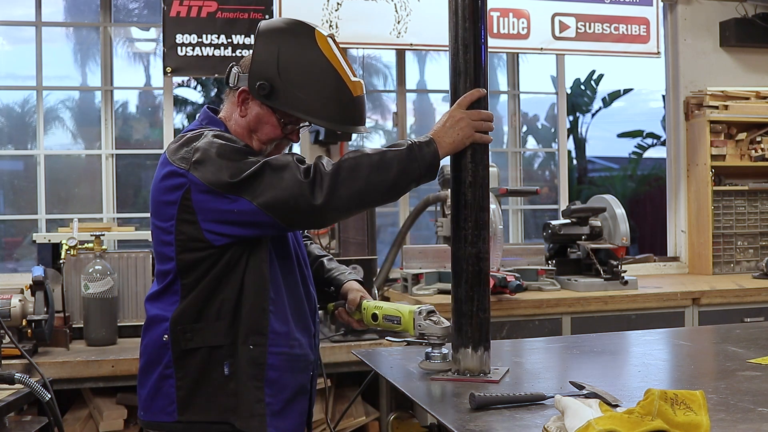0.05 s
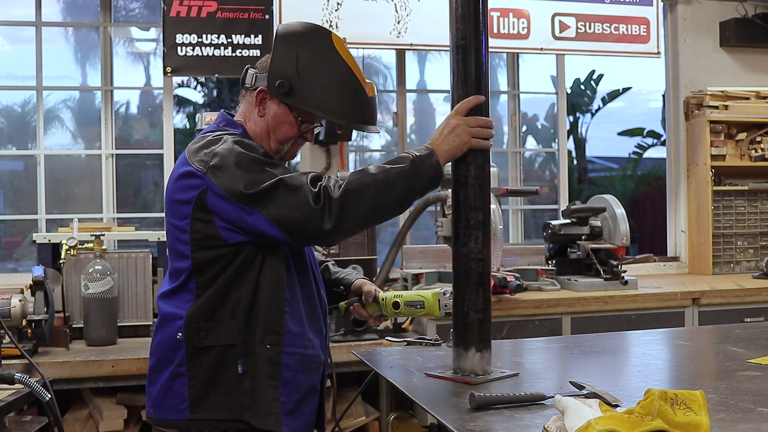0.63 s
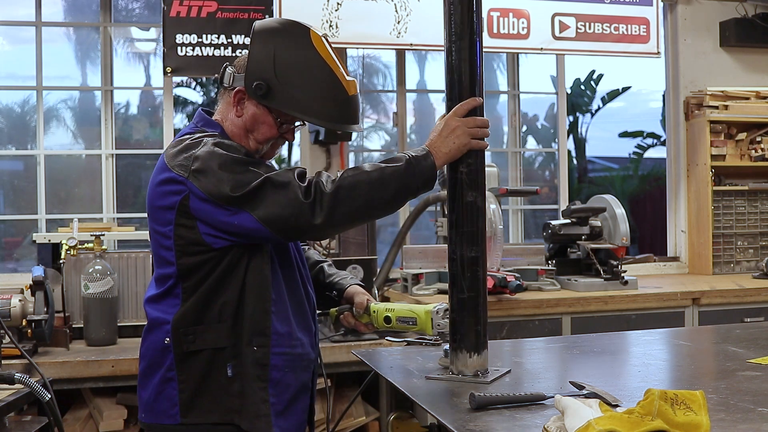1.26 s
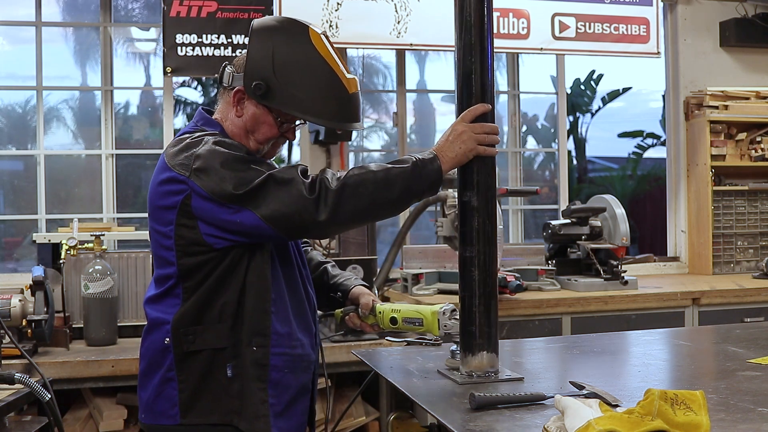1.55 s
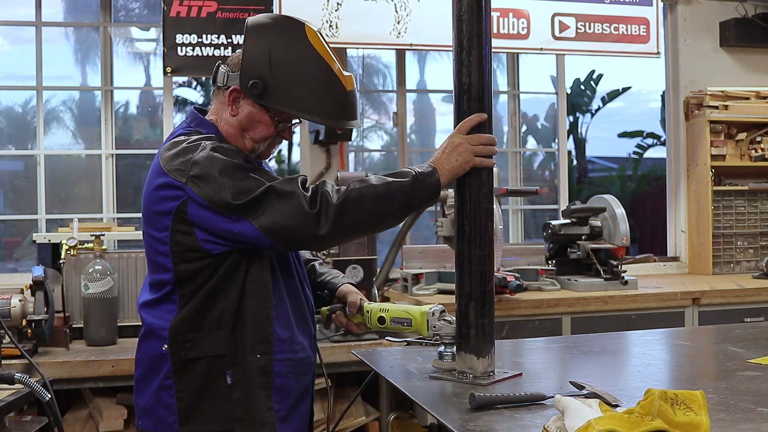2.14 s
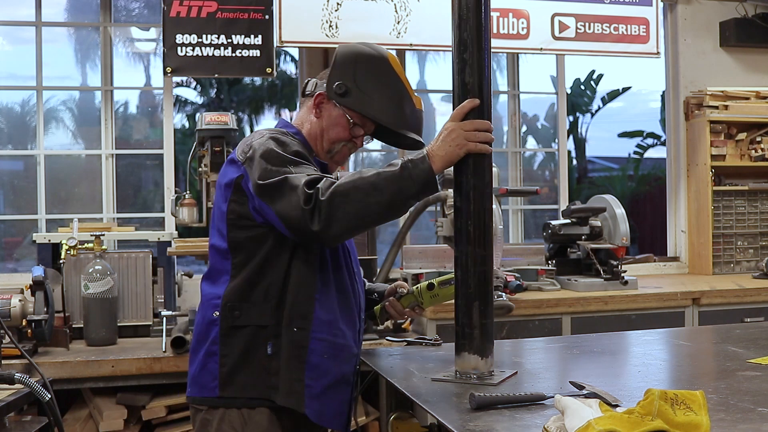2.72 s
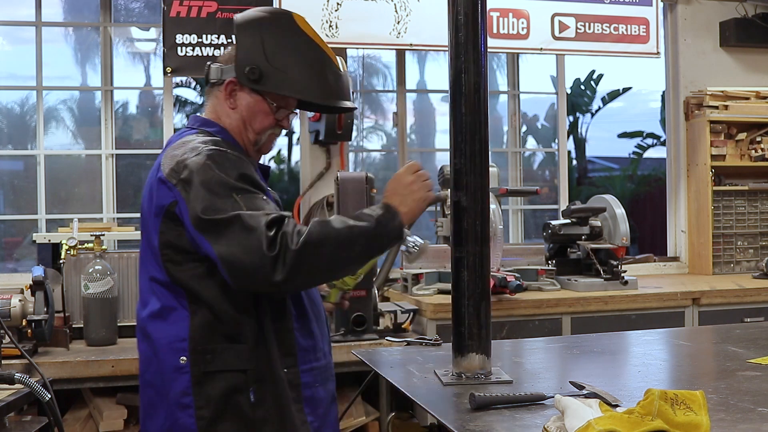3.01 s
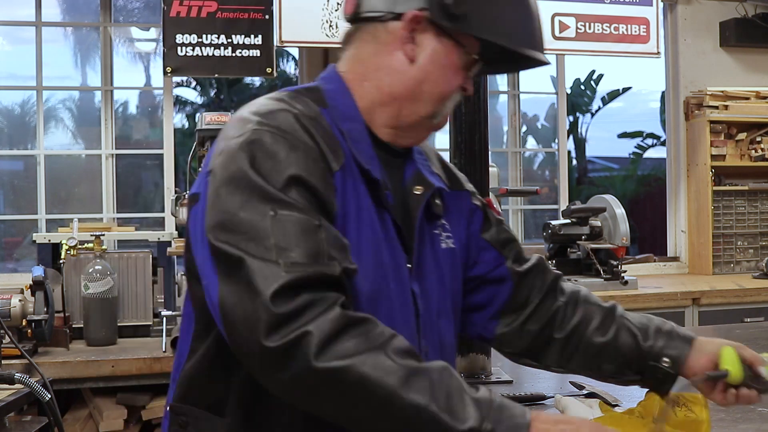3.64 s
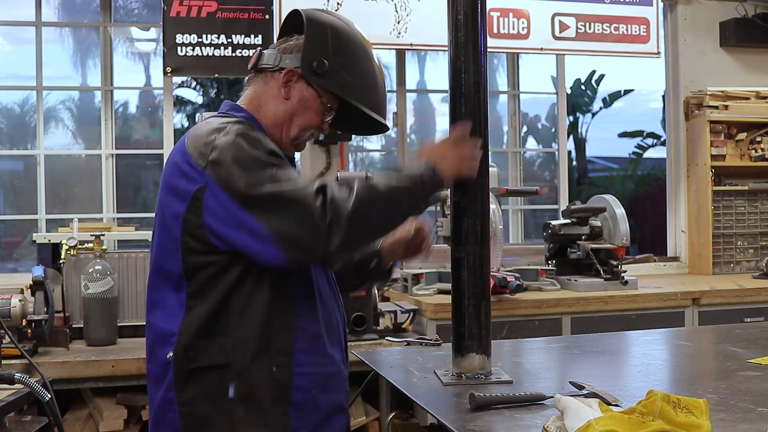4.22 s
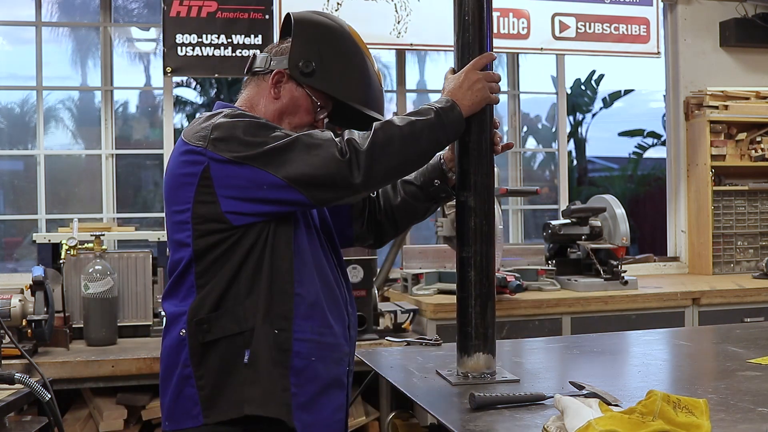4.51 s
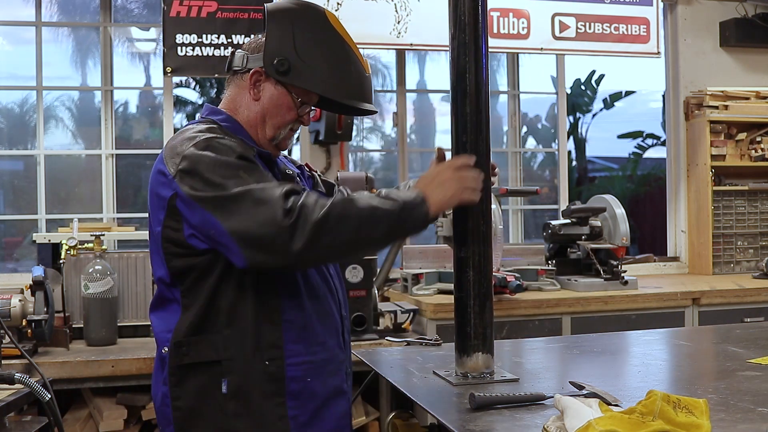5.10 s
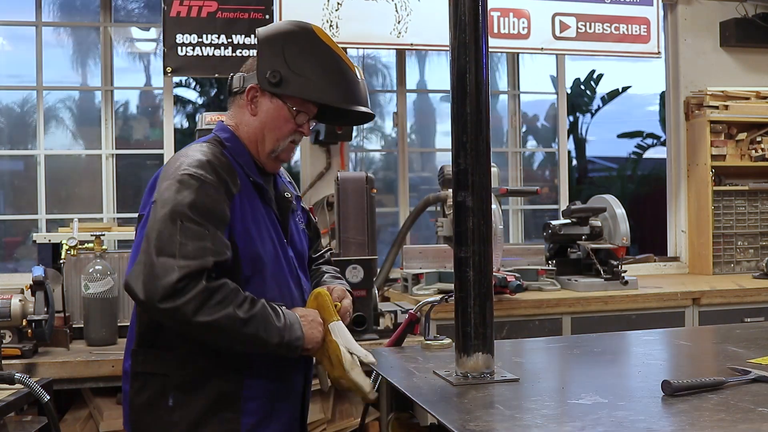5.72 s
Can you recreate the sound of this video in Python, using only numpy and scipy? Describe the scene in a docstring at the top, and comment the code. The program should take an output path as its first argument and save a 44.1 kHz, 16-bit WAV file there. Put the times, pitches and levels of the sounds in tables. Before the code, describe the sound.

An angle grinder's wire wheel scours steel at a sped-up high pitch, winds down, and is set down with one sharp metal knock.

```python
"""In a workshop, an angle grinder scours a steel post with a wire wheel in four strokes and coasts down.
Wire impacts make hiss, and harmonics of the rotation excite the post's resonances. Set on a steel table,
the tool rings its modes with a sharp knock. Everything runs four times too fast, so the tool, the fan
and the short echo are pitched high. At 5.5 s the pace drops to normal: the fan hums low and leather
work gloves rustle by friction."""
import sys
import numpy as np
from scipy import signal
from scipy.fft import rfft, irfft, next_fast_len
from scipy.io import wavfile
from scipy.ndimage import uniform_filter1d, minimum_filter1d, map_coordinates

SR = 44100
rng = np.random.default_rng(int(sys.argv[2]) if len(sys.argv) > 2 else 0)


def master(y):
    """Save y as 16-bit WAV."""
    cut = np.clip(np.atleast_2d(y).T, -1, 1)
    pcm = np.round(cut * 32767)  # scale
    wavfile.write(sys.argv[1], SR, pcm.astype(np.int16))


N = 254016
T = np.arange(N) / SR
LIFT_S, STOP_S, NORMAL_PACE_S = 2.62, 3.745, 5.5005  # wheel leaves the post; tool stops; pace drops

# the wheel at work, bogging down between strokes: time_s, rotation_hz
WHEEL_SPEED = [(0, 558), (.1, 603), (.3, 601), (.42, 573), (.5, 579), (.63, 567), (.81, 425), (.87, 520),
               (.96, 550), (1.11, 552), (1.16, 495), (1.23, 550), (1.3, 572), (1.39, 581), (1.49, 511),
               (1.58, 550), (1.81, 615), (1.92, 605), (2.04, 626), (2.2, 611), (2.34, 580), (2.44, 580),
               (2.51, 568), (2.62, 560)]
# strokes of the wheel on the post: start_s, end_s, relative_hiss_db, squeal_db
WHEEL_STROKES = [(-.1, .605, -22.3, -32), (0.821, 1.072, -23, -29), (1.156, 1.354, -23, -30),
                 (1.482, 2.6, -22.5, -33)]
# spectra of the wires' hiss and rasp: frequency_hz, density_db
HISS_SPECTRUM = [(2650, -53), (4500, -11), (5530, -5.5), (6030, -7), (6920, -4.5), (9660, -2.5),
                 (10600, -2), (14000, -0.5), (16000, -6)]
RASP_SPECTRUM = [(710, -70), (1200, -18), (1570, -19), (1740, -13.5), (2520, -12), (4140, -2), (4580, -5),
                 (6000, -4.5), (7800, -19), (13200, -120)]
# resonances of the steel post: centre_hz, width_hz, relative_db
POST_MODES = [(4120, 100, 7), (6176, 110, 5.5), (8100, 88, -2.5), (8820, 93, 4.5), (9260, 77, -3),
              (10050, 68, 2), (10200, 89, -10), (11010, 120, -6), (11540, 97, -1), (12070, 120, 6),
              (13400, 72, 2), (13550, 90, -2)]
# tones of the wheel and of its squeal: multiple_of_rotation, relative_db
WHEEL_HARMONICS = [(5, -3), (8, -1.5), (10, -3.5), (11, -5), (12, -1.5), (14, -10), (15, -10), (17, -2),
                   (19, 0), (20, -4), (22, -12)]
SQUEAL_HARMONICS = [(17, -9), (18, 0), (19, -6)]
# brief squeals where the wires catch: centre_s, half_length_s, multiple_of_rotation, level_db
WIRE_CATCHES = [(.125, .025, 7, -32), (0.4, 0.019, 14, -28), (0.442, .02, 18, -26),
                (0.913, 0.0092, 8, -24.5), (0.989, 0.027, 8, -34.5), (1.017, 0.011, 18, -22),
                (1.225, .025, 5, -36), (1.276, .03, 11, -30), (1.593, 0.015, 18, -20),
                (1.894, .018, 18, -25.5), (1.922, 0.016, 7, -23.5), (2.13, .09, 10, -33),
                (2.21, 0.013, 18, -19), (2.499, .025, 18, -24.5), (2.549, .05, 11, -35.5)]
# tones of the motor: multiple_of_fundamental, relative_db, roughness_share
MOTOR_HARMONICS = [(1, -19.5, 0.2), (2, -9, 1), (3, -5.5, 0.83), (4, -7, 1), (6, -1, 0.1)]
# resonances of the motor housing: centre_hz, width_hz, relative_db
HOUSING_MODES = [(607, 17, 7), (1675, 66, 2), (3690, 390, 0.5)]
# steady machine tones: pitch_hz, level_db
MACHINE_HUMS = [(808, -68), (926, -63), (1620, -64), (1798, -69), (3012, -70), (3245, -69), (4242, -73),
                (4861, -71), (12985, -80)]
# spectra of the room's air and of dull rubbing: frequency_hz, density_db
AIR_SPECTRUM = [(60, -56), (130, -42), (250, -16), (400, -8), (620, 6.5), (720, -1), (1000, 7.5),
                (1450, 0.5), (1850, 5.5), (2300, -2.5), (3000, 0.5), (5000, -7.5), (9000, -11.5),
                (14000, -10)]
SCUFF_SPECTRUM = [(76, -77), (130, -48), (440, -19), (519, -3.5), (961, -0.5), (1120, 6), (1200, -11),
                  (1310, 4.5), (2200, -3.5), (2860, -32), (4840, -120)]
# scuffs as the tool is shifted: centre_s, half_length_s, level_db
TOOL_SCUFFS = [(.72, 0.03, -44), (1.125, .022, -42.5), (1.443, .035, -50), (1.785, 0.11, -52.5),
               (2.036, 0.041, -45.5), (2.832, 0.028, -41)]
# spectrum of the coasting motor's brushes: frequency_hz, density_db
COAST_SPECTRUM = [(880, -47), (1500, -31), (2060, -12), (3520, -7.5), (4040, -11.5), (4640, -4.5),
                  (5220, -3.5), (7240, -8.5), (9010, -3.5), (13100, 1), (15100, -1.5), (16000, -18)]
# resonances of the gear case: centre_hz, width_hz, relative_db
GEAR_CASE_MODES = [(5350, 236, 7.5), (9050, 900, 10.5)]
# blows on the table: start_s, relative_ring_db, clatter_db, clatter_t60_s
TABLE_BLOWS = [(3.726, -60, -38, .08), (3.7425, -10, -6, 0.16), (3.8284, -35, -34, 0.28),
               (3.8566, -34, -30.5, 0.21), (3.925, -39, -49, 0.31), (4.277, -43.5, -37, 0.021)]
# modes of the steel table: pitch_hz, relative_db, t60_s
TABLE_MODES = [(536, -14.5, 0.056), (681, -11, 0.21), (783, -15, 0.19), (997, -10, 0.12), (1034, -1, 0.11),
               (1273, -3, 0.13), (1320, -4, 0.17), (1424, -4, 0.12), (1540, -20, 0.13), (1900, -2, 0.13),
               (2620, -22, 0.14), (2950, -10, 0.13), (2920, -1.5, 0.071), (3600, -31, 0.097),
               (3915, -13, 0.19), (4500, -8, 0.16), (4900, -20, .09), (5660, -18, .1), (7000, -25, 0.11),
               (7740, -14, 0.22), (8270, -11, 0.072), (9590, -11, .1), (10500, -21, .09),
               (11350, -24, 0.12)]
# spectrum of the metallic clatter: frequency_hz, density_db
CLATTER_SPECTRUM = [(120, -50), (240, -55), (340, -25), (480, -21.5), (680, -6), (860, -15), (1100, -5),
                    (1400, 1), (2000, -4), (2750, -1), (3840, -5.5), (7700, -5), (11000, -8.5),
                    (16000, -12)]
# reverberation time of the room: frequency_hz, t60_s
ROOM_DECAY = [(300, 0.61), (1000, 0.37), (1400, 0.49), (2500, 0.16), (15000, 0.1)]
# hands brushing the post and the jacket: start_s, relative_db, decay_s
HAND_SWISHES = [(4.277, -37.5, 0.019), (4.402, -48, 0.015), (4.431, -55, .015), (4.566, -52, .012),
                (5.407, -48, 0.0094)]
# spectra of brushed cloth, rubbed leather and its creases: frequency_hz, density_db
CLOTH_SPECTRUM = [(880, -40), (1500, -7), (2000, -9), (2460, -7), (6690, -3), (14200, -4), (16000, -6)]
LEATHER_SPECTRUM = [(29, -75), (50, -50), (156, -15), (196, -18.5), (277, -3.5), (326, -19), (442, -14.5),
                    (612, -20), (998, -17), (1170, -20), (1630, -14.5), (3390, -16), (6500, -35),
                    (8450, -61), (14300, -120)]
CREASE_SPECTRUM = [(2650, -31), (4500, -6.5), (7340, -2), (10600, -19.5), (13300, -32), (15000, -51)]


def amp(db):
    """Amplitude grows tenfold for every 20 decibels."""
    return 10 ** (np.asarray(db) / 20)


def unit(x):
    """Normalisation to rms 1."""
    return x / np.sqrt(np.mean(x ** 2) + 1e-20)


def along(points, hz):
    """Interpolation of (frequency_hz, value) points on a logarithmic frequency axis."""
    frequencies, values = np.transpose(points)
    return np.interp(np.log(hz + 1), np.log(frequencies + 1), values)


def after(start_s, fade_s):
    """A linear envelope rising from 0 to 1."""
    return np.clip((T - start_s) / fade_s, 0, 1)


def swell(centre_s, half_s):
    """A Gaussian envelope of height 1."""
    return np.exp(-((T - centre_s) / half_s) ** 2 / 2)


def wobble(rate_hz):
    """Smooth random modulation: a spline through rate_hz knots a second."""
    return map_coordinates(rng.standard_normal(int(N * rate_hz / SR) + 4), [T * rate_hz])


def filtered(x, response):
    """Linear filtering multiplies the spectrum by a frequency response."""
    size = next_fast_len(N + SR // 2)
    return irfft(rfft(x, size) * response(np.fft.rfftfreq(size, 1 / SR)), size)[:N]


def noise(spectrum, grain_db=0, grain_hz=900):
    """Coloured noise of rms 1, broken into grains by amplitude modulation."""
    grains = rng.standard_normal(N) * amp(grain_db * np.tanh(wobble(grain_hz)))
    return unit(filtered(grains, lambda hz: amp(along(spectrum, hz))))


def patchy(x, depth_db):
    """Modulation in time and frequency makes brief flares and gaps, a few hundred Hz wide."""
    spectra = signal.stft(x, nperseg=256)[2]
    field = uniform_filter1d(rng.standard_normal(spectra.shape), size=3, axis=0)
    field = uniform_filter1d(field, size=10, axis=1)
    return unit(signal.istft(spectra * amp(depth_db * unit(field)), nperseg=256)[1][:N])


def angle(hz):
    """Phase is the time integral of frequency."""
    return 2 * np.pi * np.cumsum(hz * np.ones(N)) / SR


def tone(phase, rough, rate_hz):
    """Random modulation broadens a spectral line of rms 1; rough is the share that flutters."""
    flutter = np.sqrt(1 - rough) + np.sqrt(rough / 2) * (wobble(rate_hz) + 1j * wobble(rate_hz))
    return unit(np.real(flutter * np.exp(1j * (phase + rng.uniform(0, 2 * np.pi)))))


def wavering(swing_db):
    """Slow amplitude modulation makes a tone come and go."""
    return unit(amp(swing_db * np.tanh(wobble(35))))


def resonate(x, modes, ring_db):
    """Forced vibration: damped resonances add to the direct sound, and the sum has rms 1."""
    def peaks(hz):
        return sum(amp(db) * 1j * hz * width / (centre ** 2 - hz ** 2 + 1j * hz * width)
                   for centre, width, db in modes)
    return unit(filtered(x, lambda hz: 1 + amp(ring_db) * peaks(hz)))


def wheel_speed():
    """Rotation in Hz sags and recovers at work, then decays under air drag and dry friction."""
    drag_s, friction_hz = 1.1, 190
    working_hz = np.interp(T, *np.transpose(WHEEL_SPEED))
    drag = np.exp(-np.maximum(T - LIFT_S, 0) / drag_s)
    return np.maximum((working_hz + friction_hz) * drag - friction_hz, 1)


def strokes(pace):
    """Contact pressure sets the friction level: each stroke leans in, holds and eases to a graze."""
    starts, ends, hiss_db, squeal_db = np.transpose(WHEEL_STROKES)
    presses = np.array([after(start, 0.056) * (1 - after(end, 0.078)) for start, end in zip(starts, ends)])
    pressure = presses.sum(axis=0)
    graze_db = -26.5 + 20 * np.log10(pace)
    tremor_db = 0.7 * wobble(21.9)  # the unsteady hand
    contact_db = hiss_db @ presses + (1 - pressure) * graze_db + tremor_db
    return pressure, contact_db, amp(squeal_db) @ presses


def scouring(pace, turn):
    """Wires rake the steel in bunches once a turn; harmonics swell as they cross the post's resonances."""
    pressure, contact_db, squeal_gain = strokes(pace)
    drive = pace ** 3  # a labouring wheel hardly sings
    bite = unit(amp(0.64 * np.cos(turn) + 0.49 * wobble(110)))
    impacts = bite * patchy(noise(HISS_SPECTRUM, grain_db=1.5, grain_hz=2500), depth_db=1.5)
    hiss = amp(contact_db - 0.26) * resonate(impacts, POST_MODES, ring_db=-6.5)
    scrape = bite * patchy(noise(RASP_SPECTRUM, grain_db=1, grain_hz=1500), depth_db=1.23)
    rasp = amp(-31.5 - 3 * (1 - pressure)) * scrape
    harmonics = sum(amp(db) * tone(k * turn, rough=0.82, rate_hz=50) for k, db in WHEEL_HARMONICS)
    sing = amp(contact_db - 9.5) * drive * resonate(harmonics, POST_MODES, ring_db=5.5)
    whine = amp(-36) * pressure * drive * tone(7 * turn, rough=0.4, rate_hz=70)
    catching = sum(amp(db) * wavering(swing_db=5) * tone(k * turn, rough=0.6, rate_hz=70)
                   for k, db in SQUEAL_HARMONICS)  # wires catch and let go
    squeal = squeal_gain * resonate(catching, POST_MODES, ring_db=-6)
    flares = sum(amp(db) * swell(centre_s, half_s) * tone(k * turn, rough=0.36, rate_hz=70)
                 for centre_s, half_s, k, db in WIRE_CATCHES)
    return (hiss + rasp + sing + whine + squeal + flares) * (1 - after(LIFT_S, 0.035))


def motor(pace, turn):
    """A harmonic series just below the wheel's drives the housing's resonances and fades as it slows."""
    phase = turn / 1.023
    harmonics = sum(amp(db) * wavering(swing_db=2) * tone(k * phase, rough, rate_hz=60)
                    for k, db, rough in MOTOR_HARMONICS)
    drive = pace ** 1.7 * (1 - after(LIFT_S, 0.42))
    return amp(-40.5) * drive * resonate(harmonics, HOUSING_MODES, ring_db=1)


def workshop():
    """Fan and machine tones over air. Pitch scales with pace, so the fan ends two octaves lower."""
    slow = after(NORMAL_PACE_S, 0.0009)
    drone_hz = 559.4 - 4.3 * (T - 3) ** 2  # a drone sinks ever faster
    drone_db = -53 - 7.5 * np.abs(T - 4.7)
    drone = amp(drone_db) * after(3, 0.11) * tone(angle(drone_hz), rough=0.05, rate_hz=12)
    hums = sum(amp(db) * tone(angle(hz), rough=0.24, rate_hz=20) for hz, db in MACHINE_HUMS)
    whine = amp(-76 + 9 * after(4.4, 0.2)) * tone(angle(6481), rough=0.1, rate_hz=12)
    fast_fan = amp(-50) * tone(angle(1122), rough=0.84, rate_hz=85)
    slow_fan = amp(-36) * tone(angle(277), rough=0.25, rate_hz=18) * after(NORMAL_PACE_S, 0.041)
    air = noise(AIR_SPECTRUM)
    fast_room = fast_fan + drone + hums + whine + amp(-51.5) * air
    return (1 - slow) * fast_room + slow_fan + slow * amp(-59) * air


def scuffing():
    """Sliding friction of tool and sleeves makes dull noise that swells as the tool is shifted."""
    rubbing = amp(-54.5) * (1 - after(LIFT_S, 1.0))
    shifts = sum(amp(db) * swell(centre_s, half_s) for centre_s, half_s, db in TOOL_SCUFFS)
    return (rubbing + shifts) * noise(SCUFF_SPECTRUM, grain_db=-2.5, grain_hz=200)


def coasting(speed_hz, pace, turn):
    """Brushes hiss and the gear case rings; the tooth-mesh frequency falls through its resonances."""
    tooth_count, case_fade_hz = 40, 282.5  # below this rotation rate the ring dies away
    rattle = unit(amp((1 - pace) * (3.9 * np.cos(turn) + 1.9 * wobble(200))))  # slow gears rattle more
    windage_gain, brush_gain = amp(-25.5) * pace ** 2, amp(-38.5)
    hiss = np.hypot(windage_gain, brush_gain) * patchy(noise(COAST_SPECTRUM, grain_db=-1), depth_db=1.5)
    ring = tone(angle(4110 + 130 * wobble(400)), rough=1, rate_hz=500)
    case = amp(-38.5) * np.sqrt(pace) * ring / np.hypot(1, (case_fade_hz / speed_hz) ** 6)
    mesh = tone(tooth_count * turn + angle(300 * wobble(300)), rough=1, rate_hz=900)
    teeth = amp(-50.5) * resonate(mesh, GEAR_CASE_MODES, ring_db=7) * after(3.03, 0.41)
    return (rattle * (hiss + teeth) + case) * after(LIFT_S, 0.023) * (1 - after(STOP_S, 0.068))


def knocks():
    """Free vibration: after each blow the table's modes decay exponentially amid a dense clatter."""
    out = np.zeros(N)
    for start_s, ring_db, clatter_db, clatter_t60_s in TABLE_BLOWS:
        onset = int(start_s * SR)
        t = np.maximum(T - start_s, 0)[onset:onset + SR // 2]
        ring = sum(amp(db + rng.normal(0, 1) - 60 * t / t60_s)
                   * np.sin(2 * np.pi * hz * t + rng.uniform(0, 2 * np.pi))
                   for hz, db, t60_s in TABLE_MODES)
        ring /= np.std(ring[:SR // 100])  # the first 10 ms set the level
        ring *= amp(ring_db - 1) * (1 - np.exp(-t / 0.002))
        clatter = noise(CLATTER_SPECTRUM)[:len(t)] * amp(clatter_db - 60 * t / clatter_t60_s)
        out[onset:onset + len(t)] += ring + clatter * (1 - np.exp(-t / 0.00054))
    return out


def echo(x):
    """Reverberation is convolution with the room's impulse response; the treble dies first."""
    hz, t, spectra = signal.stft(rng.standard_normal(SR // 2), SR, nperseg=256)
    decay = amp(-60 * t / along(ROOM_DECAY, hz)[:, None])
    tail = signal.istft(spectra * decay, SR, nperseg=256)[1]
    return signal.fftconvolve(x, tail / np.linalg.norm(tail))[:N]


def hand_swishes():
    """Sliding friction of hands on steel and cloth gives short, soft bursts of noise."""
    envelope = np.zeros(N)
    for start_s, db, decay_s in HAND_SWISHES:
        age = np.maximum(T - start_s, 0) / decay_s
        envelope += amp(db + 6.5) * np.sqrt(age) * np.exp(-age)
    return envelope * noise(CLOTH_SPECTRUM, grain_db=1.5)


def gloves():
    """Friction of leather on leather in one tug; creases swell more than the rub, so it brightens."""
    peak_s, rise_db_per_s, fall_db_per_s = 5.625, 57, 40
    pull_db = -np.maximum(rise_db_per_s * (peak_s - T), fall_db_per_s * (T - peak_s))
    rub = amp(-29.5 + pull_db) * noise(LEATHER_SPECTRUM, grain_db=0.5, grain_hz=300)
    crease = amp(-41.5 + 1.9 * pull_db) * noise(CREASE_SPECTRUM, grain_db=-0.5, grain_hz=300)
    return (rub + crease) * after(NORMAL_PACE_S, 0.002)


def scene():
    """Superposition: the sources add, the same in both ears; the sped-up tool has no bass."""
    speed_hz = wheel_speed()
    pace = speed_hz / speed_hz.max()
    turn = angle(speed_hz)
    grinder = scouring(pace, turn) + motor(pace, turn) + coasting(speed_hz, pace, turn) + scuffing()
    handling = knocks() + hand_swishes()
    work = grinder + handling + amp(-13) * echo(handling)
    work = filtered(work, lambda hz: hz ** 4 / (hz ** 4 + 150 ** 4))  # high-pass at 150 Hz
    mono = work + gloves() + workshop()
    return np.array([mono, mono]) * after(0, 0.003)


def record(dry):
    """Fast peak limiting holds the loudest peaks at full scale; a low-pass then limits the band."""
    window, top_hz = 45, 15850  # the window spans about 1 ms
    needed = 1 / np.maximum(np.abs(dry), 1)
    gain = uniform_filter1d(minimum_filter1d(needed, size=window), size=window)
    return np.array([filtered(channel, lambda hz: hz < top_hz) for channel in dry * gain])


dry = scene()
out = record(dry)
master(out)
```